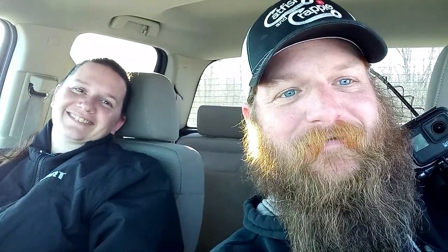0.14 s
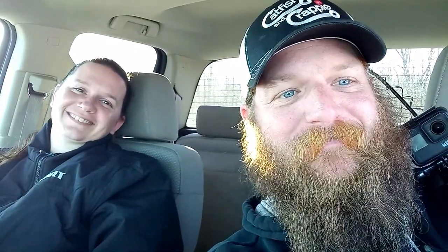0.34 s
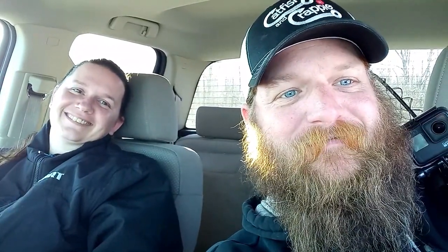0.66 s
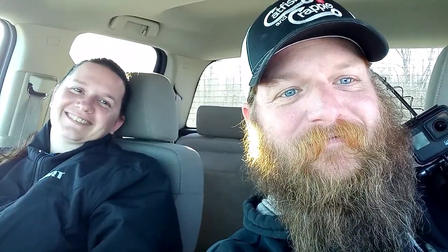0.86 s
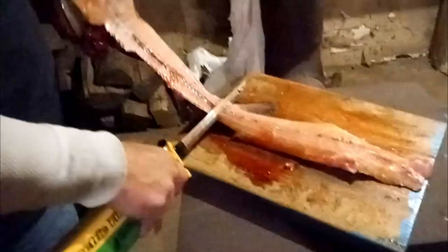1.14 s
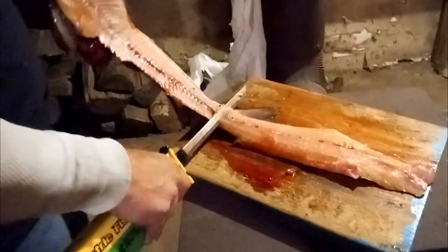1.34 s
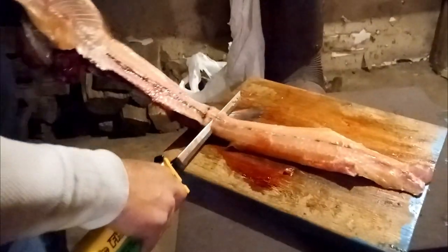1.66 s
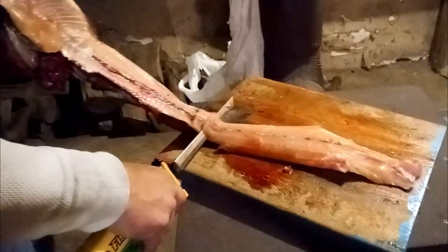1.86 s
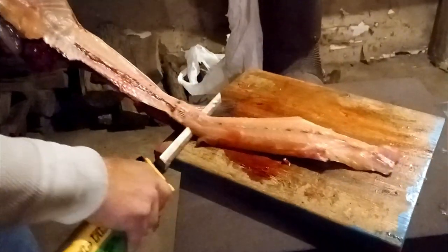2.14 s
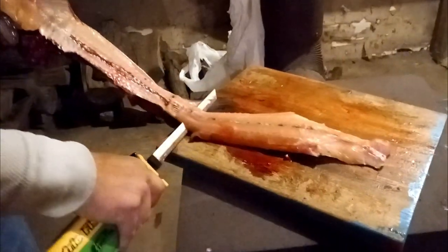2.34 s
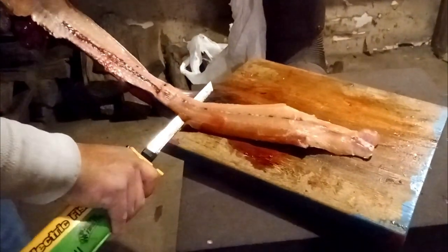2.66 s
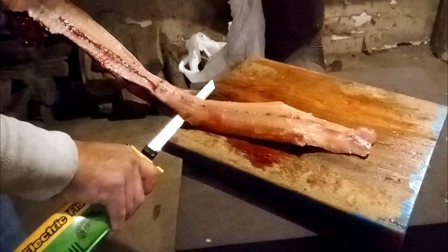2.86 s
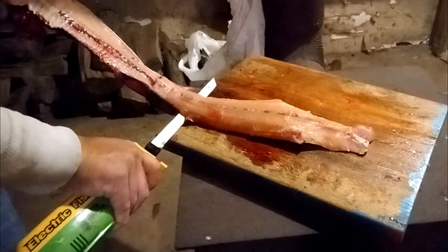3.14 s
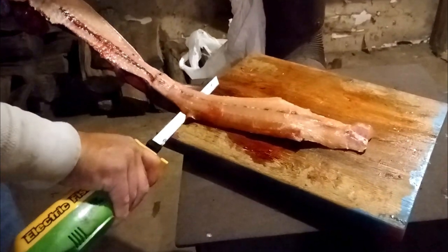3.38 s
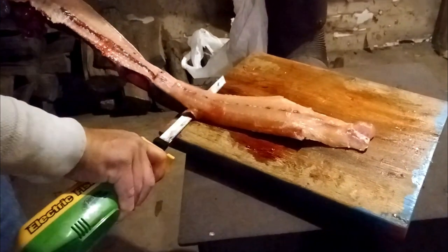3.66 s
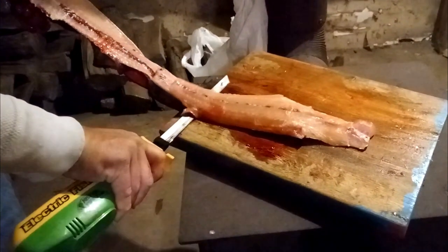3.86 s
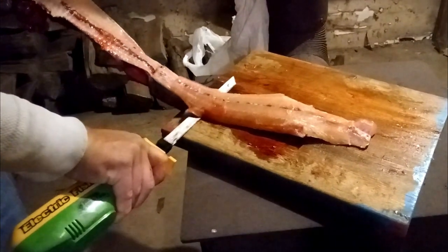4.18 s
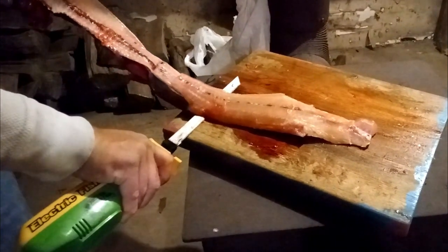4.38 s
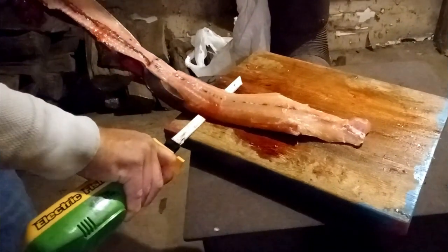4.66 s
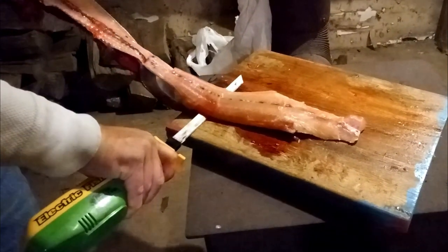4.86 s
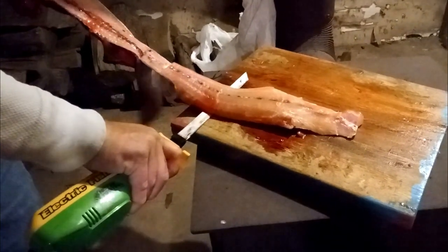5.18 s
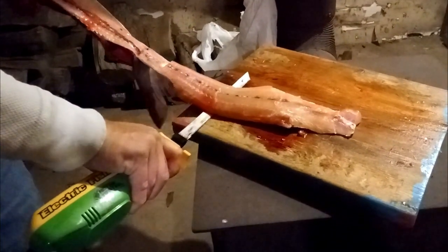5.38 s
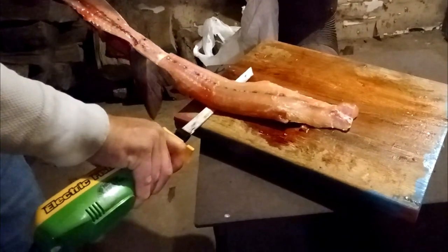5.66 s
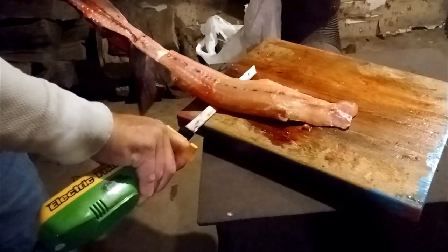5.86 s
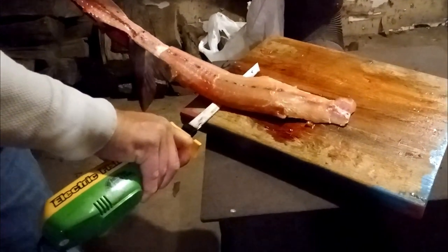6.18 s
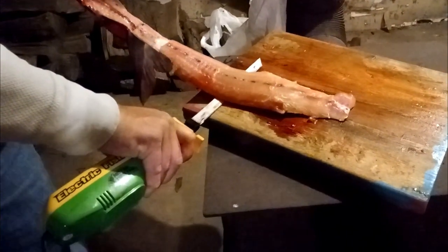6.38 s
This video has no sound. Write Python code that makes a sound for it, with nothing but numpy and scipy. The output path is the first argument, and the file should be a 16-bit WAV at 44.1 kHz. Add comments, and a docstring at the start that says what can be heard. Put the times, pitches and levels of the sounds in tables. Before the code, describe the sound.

Soft cloth brushes and a few tiny knocks open in a still car interior, followed by near silence. Then, close up in a shed, a hand-held electric knife clicks on and spins up in half a second. It keeps running to the end: buzzing motor whine, rattling plastic housing, hissing twin blades and teeth rasping on the cut, with a strong short scrape partway through. Dry, close mono sound.

```python
"""Parked car, then shed: a swish and small knocks, then an electric fillet knife saws a fillet off its skin.
The cloth is shaped noise; the knocks are blows on ringing modes. The motor runs up and whines: its partials
swell at each resonance of the drive, and the pitch follows the load. Gears and twin blades clatter through the
same round of contacts on every stroke, ringing the plastic housing; the blades hiss and tick. Faint bumps and
rubs and one strong scrape as the blades bite are swells of narrow noise bands; quiet air lies under everything."""
import sys
import numpy as np
from scipy import signal
from scipy.fft import rfft, irfft, next_fast_len
from scipy.io import wavfile
from scipy.ndimage import uniform_filter1d, map_coordinates

SR = 44100
rng = np.random.default_rng(int(sys.argv[2]) if len(sys.argv) > 2 else 0)


def generate_wav(sig):
    """Save sig (samples, or channels by samples) to the path in sys.argv[1] as 16-bit PCM at SR."""
    pcm = np.round(np.clip(np.atleast_2d(sig).T, -1, 1) * 32767).astype(np.int16)
    wavfile.write(sys.argv[1], SR, pcm)


N = 287532
TIME = np.arange(N) / SR  # s

# quiet air, first in the car, then in the shed: start_s, level_db
AIR_LEVEL = [(0, -69), (.5, -70), (1.21, -69), (1.222, -105), (1.25, -105), (1.262, -87), (1.32, -85),
             (6.52, -80)]
# air spectrum: freq_hz, relative_density_db
AIR_SPECTRUM = [(30, -45), (60, -25), (130, -16.5), (220, -23.5), (500, -20.5), (950, -20), (1250, -20),
                (1750, -21), (3000, -28.5), (4500, -34), (5500, -25.5), (6600, -23.5), (8500, -35),
                (15000, -50)]

# sleeve spectra, dull and bright part: freq_hz, relative_density_db
SWISH_DULL = [(80, -22), (160, -13), (300, -16), (500, -6), (1000, -14), (1600, -1), (2400, -14),
              (4000, -13), (5200, -40), (9000, -60)]
SWISH_BRIGHT = [(900, -30), (1900, -3.5), (2600, -10), (3200, -9), (4500, -14), (5500, -4.5), (7500, -12),
                (10000, -24), (16000, -34)]
# resonances that colour the swish: centre_hz, width_hz, lift_db
SWISH_MODES = [(517, 80, 8.5), (836, 56, 19), (973, 90, 24.5), (1300, 120, 7), (1670, 120, 1),
               (2620, 110, 12)]
# sleeve brushes: centre_s, level_db, fade_s, brightness_0_to_1
BRUSHES = [(0.053, -43, 0.03, 0.93), (.102, -42, 0.021, 0.03), (0.26, -61, 0.0093, 1), (.21, -59, 0.047, 1)]
BRUSH_SHAPE = 0.91  # exponent: 1 = pointed swell, 2 = rounded

# small knocks in the car: start_s, blow_db, contact_cutoff_hz
KNOCKS = [(0.117, -43, 470), (0.2438, -39, 9000), (0.25, -42.5, 2400), (0.274, -49, 2400)]
# modes the knocks ring: freq_hz, level_db, t60_s
KNOCK_MODES = [(133, -14, 0.23), (296, -8.5, 0.022), (1024, -2, 0.063), (1670, -2.5, 0.047),
               (2850, -11, 0.035), (3460, -3.5, 0.017), (5615, -13, 0.035)]
# bumps and rubs, faint ones and one strong scrape as the blades bite: centre_s, level_db, band_hz, fade_s
BUMPS_AND_RUBS = [(0.647, -62, 930, 0.033), (2.191, -48, 171, 0.04), (2.766, -59, 139, 0.0706),
                  (3.048, -60, 134.6, 0.094), (3.6, -28.5, 1000, 0.086)]
# trigger clicks: start_s, level_db
TRIGGER_CLICKS = [(1.318, -51), (1.342, -54)]

# run-up: exponential approach to running speed
SWITCH_ON_S, RUN_UP_S, UP_TO_SPEED_S = 1.345, 0.178, 1.9
RUNNING_WHINE_HZ, WHINE_CYCLES_PER_STROKE = 2614, 80
# whine pitch under the load of the cut, before the run-up scales it: start_s, pitch_hz
LOADED_WHINE = [(1.9, 2767.8), (2.05, 2880.2), (2.2, 2926.8), (2.36, 2939.0), (2.56, 2906.3), (2.9, 2787.9),
                (3.1, 2743.3), (3.3, 2722.1), (3.55, 2725.7), (3.85, 2754.0), (4.05, 2754.1),
                (4.22, 2729.3), (4.72, 2642.6), (4.95, 2619.0), (5.5, 2618.1), (5.85, 2620.5),
                (6.25, 2627.5), (6.52, 2619.9)]

# starting torque jolts the whole knife once
JOLT_AT_S, JOLT_FADE_S = 1.42, 0.04
JOLT_HOUSING_DB, JOLT_HISS_DB, JOLT_TEETH_DB, JOLT_OCTAVE_DB = 7.5, 5.5, 6, 6.5

# handle hum: start_s, level_db
HUM_LEVEL = [(2.5, -67.9), (3.05, -61), (3.3, -62), (3.85, -86), (4.1, -66), (4.35, -57.7), (4.8, -63.0),
             (6.45, -61.5)]
HUM_ORDER, HUM_RISE_DB_PER_S = 5, 13  # multiple of the stroke rate; build-up before the first point

# gear tones: stroke_rate_multiple, light_load_relative_db, full_load_relative_db
GEAR_ORDERS = [(10, -60, -64), (11, -65, -64), (12, -64, -58), (13, -57, -55), (15, -55, -60),
               (16, -55, -58), (18, -58, -54), (20, -37.5, -39.5), (22, -39, -37.5), (24, -46, -39),
               (29, -45, -46), (30, -39.5, -44), (31, -52, -48), (35, -50, -46), (40, -40.5, -54),
               (44, -48, -45), (52, -49, -48), (59, -48, -45), (60, -43, -54), (62, -50, -44),
               (64, -45, -51), (78, -54, -43), (84, -54, -45), (86, -56, -49), (260, -63, -57),
               (380, -70, -65)]
GEAR_DB = -1.03
LIGHT_LOAD_SPEED = 1.04  # share of running speed from which the load counts as light

# effort of the drive: start_s, level_db
EFFORT = [(1.75, -31.5), (2.3, -29), (3.05, -30), (3.9, -28.5), (4.8, -30), (6.45, -30.5)]
HOUSING_DB, HISS_DB = 0.76, -9  # relative to the effort
CLATTER_SPEED_POWER, HISS_SPEED_POWER = 0.68, 0.82  # amplitude exponents on the run-up
# pressure of the teeth on the board, as the level of their rasp: start_s, level_db
PRESSURE = [(1.52, -42.5), (1.62, -37), (2.1, -33), (3.42, -29.5), (3.57, -26), (3.72, -26.5), (4.3, -30.5),
            (6.45, -30.5)]
TEETH_DB = -3.5  # relative to the pressure
# housing, blade and board spectra: freq_hz, relative_density_db
HOUSING = [(60, -42), (130, -24), (260, -22.5), (420, -22), (540, -9), (720, -1.5), (920, -1), (1200, 4),
           (1650, -2.5), (2350, -2.5), (2800, -3.5), (3100, -10), (4100, -23.5), (6000, -39)]
BLADES = [(3000, -24), (3780, -1), (4250, -15.5), (4800, -6), (5700, -0.5), (6450, 5), (7300, -1),
          (8400, -7.5), (9600, -15.5), (11600, -12.5), (13000, -38), (14200, -21), (16000, -21)]
BOARD = [(150, -62), (300, -21), (540, -15.5), (680, 3.5), (800, 9), (1000, -5.5), (1400, -30), (2200, -28)]
# narrow housing resonances: centre_hz, width_hz, lift_db
HOUSING_MODES = [(808, 43, 7.5), (1180, 160, 3), (1540, 60, 3.5), (1716.7, 88, 5), (1930, 51, 1),
                 (2045, 59, 5.5)]
# blade ticks within a stroke: place_0_to_1, relative_level_db
TICKS = [(.12, 21), (.34, -38), (.66, -34), (.8, -19)]
# modes the blade ticks ring: freq_hz, relative_level_db, t60_s
TICK_MODES = [(6900, 6.5, 0.0074), (7800, 4, .005), (12400, 2, .005), (13950, -4.5, 0.0067),
              (14700, -12, .006)]

# whine partials away from any resonance, steady running
WHINE_DB, OCTAVE_DB, THIRD_DB, FOURTH_DB, SIXTH_DB = -41.5, -56.5, -65, -63.5, -67
# drive resonances the partials sweep through: centre_hz, width_hz, lift_db
DRIVE_MODES = [(1390, 490, 10.5), (2147, 350, 15), (2606, 132, 7.5), (2690, 52.6, 10.5), (2953, 73, 7.5),
               (3420, 520, 10), (5440, 350, 5.5), (5715, 510, 14), (6770, 760, 14), (9100, 340, 3),
               (10700, 2200, 11)]
# gear-tooth chatter: extra roughness at the start settles to the running value
ROUGH_START, ROUGH_RUNNING, SETTLE_S = 1, 0.078, 1
CHATTER_CYCLES, CHATTER_DB = 0.081, 2.5  # phase and level scatter per unit roughness
WAVER_DB, WAVERS_PER_S = 1.0, 5  # slow level waver of the partials
THROB_HZ = 120  # twice the mains frequency
# throb depth of the whine: start_s, depth_0_to_1
THROB_DEPTH = [(1.55, 0.85), (2.2, 0), (3.2, 0.66), (4.2, 0.55), (4.9, 0.2)]
THROB_SWING, THROB_BEND_CYCLES = 0.7, 0.14  # at full depth: share of amplitude, phase
STARTING_LIFT_DB = 11.5  # lift of whine and octave by the starting torque at standstill
WHINE_FOLLOWS_PRESSURE = 0.47  # share of the pressure's dB swing
ENGAGE_FROM, ENGAGE_SPAN = 0.21, 0.15  # shares of running speed over which the gears begin to sing

CUTOFF_HZ = 15750


def from_db(db):
    """Decibels to gain."""
    return 10 ** (np.asarray(db) / 20)


def rms_one(x):
    """Scale to unit rms."""
    return x / np.sqrt(np.mean(x ** 2) + 1e-20)


def in_time(rows):
    """One curve for each column after the time column."""
    s, *columns = np.transpose(rows)
    return [np.interp(TIME, s, c) for c in columns]


def drift(rate_hz):
    """Smooth random curve with spread 1."""
    knots = rng.standard_normal(int(rate_hz * N / SR) + 3)
    coarse_s = TIME[::32]
    curve = map_coordinates(knots, [coarse_s * rate_hz], order=3, mode="nearest")
    return np.interp(TIME, coarse_s, rms_one(curve))


def lift_db(hz, modes):
    """Lift that a set of resonances gives at a frequency."""
    return sum(lift / (1 + (2 * (hz - centre) / width) ** 2) for centre, width, lift in modes)


def coloured(x, spectrum, modes=()):
    """Pass through a body with a broad spectrum and narrow resonances; rms 1."""
    size = next_fast_len(N + SR)
    hz = np.maximum(np.fft.rfftfreq(size, 1 / SR), 1)
    points = np.array(spectrum)
    level_db = np.interp(np.log(hz), np.log(points[:, 0]), points[:, 1]) + lift_db(hz, modes)
    bass_cut = np.minimum(hz / points[0, 0], 1) ** 2
    return rms_one(irfft(rfft(x, size) * from_db(level_db) * bass_cut, size)[:N])


def evened(x):
    """Hold the slow level of a running sound near 1."""
    power = uniform_filter1d(x ** 2, size=2700)
    return x / np.sqrt(np.maximum(power, 0) + 1e-4)


def ring(x, hz, t60_s):
    """Resonator: a unit click starts a decaying sine of height 1."""
    r = from_db(-60 / (t60_s * SR))
    w = 2 * np.pi * hz / SR
    return signal.lfilter([0, np.sin(w)], [1, -2 * r * np.cos(w), r * r], x + 1e-18)


def tone(cycles, level_db):
    """A sine of the given rms level."""
    return np.sqrt(2) * from_db(level_db) * np.sin(2 * np.pi * cycles)


def contacts(strokes, count, jitter_s, uneven_db, spread_db):
    """The same round of contacts on every stroke, each a little early or late, harder or softer."""
    place = (np.arange(count) + rng.random(count)) / count
    force = rng.choice([-1, 1], count) * from_db(spread_db * rng.uniform(-1.27, 1, count))
    timing, strength = rng.standard_normal((2, 256, count))  # one row per stroke
    at_stroke = np.arange(len(timing))[:, None] + place
    when_s = np.interp(at_stroke, strokes, TIME, right=-1) + jitter_s * timing
    inside = (when_s > 0) & (when_s < TIME[-1])
    sizes = force * from_db(uneven_db * strength)
    return rms_one(np.bincount((when_s[inside] * SR).astype(int), sizes[inside], N))


def air():
    """Quiet air: shaped noise on a level curve."""
    return from_db(in_time(AIR_LEVEL)[0]) * coloured(rng.standard_normal(N), AIR_SPECTRUM)


def sleeve():
    """Each brush of the cloth swells and fades with a fine grain, part dull and part bright."""
    dull = coloured(rng.standard_normal(N), SWISH_DULL, SWISH_MODES)
    bright = coloured(rng.standard_normal(N), SWISH_BRIGHT, SWISH_MODES)
    out = np.zeros(N)
    for centre_s, level_db, fade_s, brightness in BRUSHES:
        swell = from_db(level_db) * np.exp(-np.abs((TIME - centre_s) / fade_s) ** BRUSH_SHAPE)
        out += swell * (np.sqrt(brightness) * bright + np.sqrt(1 - brightness) * dull)
    return out * from_db(2 * drift(252))


def small_knocks():
    """Something small knocks and bounces: low-passed blows, softer contact = lower cut-off, ring its modes."""
    blows = np.zeros(N)
    for start_s, blow_db, cutoff_hz in KNOCKS:
        blow = from_db(blow_db) * (np.arange(N) == round(start_s * SR))
        blows += signal.sosfilt(signal.butter(2, cutoff_hz, fs=SR, output="sos"), blow + 1e-18)
    return sum(from_db(level_db) * ring(blows, hz, t60_s) for hz, level_db, t60_s in KNOCK_MODES)


def car():
    """Cloth swishes and small knocks."""
    return sleeve() + small_knocks()


def bumps_and_rubs():
    """Faint bumps and rubs and one strong scrape as the blades bite: each a short swell of a narrow noise band."""
    out = np.zeros(N)
    for centre_s, level_db, hz, fade_s in BUMPS_AND_RUBS:
        band = signal.butter(2, [hz * 0.87, hz * 1.04], "band", fs=SR, output="sos")
        noise = rms_one(signal.sosfilt(band, rng.standard_normal(N)))
        out += from_db(level_db) * noise * np.exp(-((TIME - centre_s) / fade_s) ** 2)
    return out


def trigger():
    """The switch slides in with two small clicks, heard through the handle."""
    clicks = sum(from_db(level_db) * (TIME > start_s) * np.exp(-np.abs(TIME - start_s) / 0.0017)
                 for start_s, level_db in TRIGGER_CLICKS)
    slide = from_db(-64.5) * (TIME > TRIGGER_CLICKS[0][0]) * (TIME < 1.38)
    handle = coloured(rng.standard_normal(N), HOUSING, HOUSING_MODES)
    handle += 0.072 * coloured(rng.standard_normal(N), BLADES)
    return uniform_filter1d(clicks + slide, size=60) * handle


def run_up():
    """Share of its running speed that the motor has reached, 0-1."""
    since_on_s = np.clip(TIME, SWITCH_ON_S, UP_TO_SPEED_S) - SWITCH_ON_S
    gathered = 1 - np.exp(-since_on_s / RUN_UP_S)
    return gathered / gathered[-1]


def jolt():
    """One short swell of the starting torque, 0-1."""
    return np.exp(-((TIME - JOLT_AT_S) / JOLT_FADE_S) ** 2)


def hum(strokes):
    """The handle hums at five times the stroke rate, building up as the motor gathers speed."""
    build_up_db = -HUM_RISE_DB_PER_S * np.maximum(HUM_LEVEL[0][0] - TIME, 0)
    return tone(HUM_ORDER * strokes, in_time(HUM_LEVEL)[0] + build_up_db)


def gears(strokes, speed):
    """Multiples of the stroke rate; they stand out only near running speed, balance shifting with load."""
    light = np.clip((speed - 1) / (LIGHT_LOAD_SPEED - 1), 0, 1)
    out = np.zeros(N)
    for order, light_db, loaded_db in GEAR_ORDERS:
        level_db = GEAR_DB + loaded_db + light * (light_db - loaded_db)
        cycles = order * strokes + rng.random() + 0.04 * drift(14)
        out += tone(cycles, level_db + 2 * drift(10))
    return out * run_up() ** 14


def clatter(strokes):
    """Gear and crank contacts ring the housing; the teeth rasp on the board."""
    housing_db = in_time(EFFORT)[0] + HOUSING_DB + JOLT_HOUSING_DB * jolt()
    housing_gain = from_db(housing_db) * run_up() ** CLATTER_SPEED_POWER
    teeth_gain = from_db(in_time(PRESSURE)[0] + TEETH_DB + JOLT_TEETH_DB * jolt())
    tight = contacts(strokes, count=40, jitter_s=0.00004, uneven_db=2, spread_db=7)
    tight = signal.sosfilt(signal.butter(4, 950, "high", fs=SR, output="sos"), tight)
    loose = contacts(strokes, count=60, jitter_s=0.002, uneven_db=3, spread_db=2.5)
    drive = 0.68 * tight + 0.77 * loose + 0.34 * rng.standard_normal(N)
    housing = evened(coloured(drive, HOUSING, HOUSING_MODES))
    teeth = contacts(strokes, count=32, jitter_s=0.0004, uneven_db=3, spread_db=4)
    return housing_gain * housing + teeth_gain * evened(coloured(teeth, BOARD))


def blade_ticks(strokes):
    """The blades tap in their guide at set places of each stroke, harder in some stretches than in others."""
    taps = np.zeros(N)
    for place, level_db in TICKS:
        at = np.flatnonzero(np.diff(np.floor(strokes - place + 0.02 * drift(40))) > 0)
        taps[at] += from_db(level_db + 3.1 * np.clip(rng.standard_normal(len(at)), -3, 1.5))
    taps *= from_db(2.5 * np.clip(drift(2), -2, 1))
    return rms_one(sum(from_db(level_db) * ring(taps, hz, t60_s) for hz, level_db, t60_s in TICK_MODES))


def blades(strokes):
    """Steel slides on steel, hissing in step with the motor and ticking where the blades turn."""
    hiss_db = in_time(EFFORT)[0] + HISS_DB + JOLT_HISS_DB * jolt()
    gain = from_db(hiss_db) * run_up() ** HISS_SPEED_POWER
    rub = rng.standard_normal(N)
    rub += 0.81 * contacts(strokes, count=120, jitter_s=0.00002, uneven_db=4.5, spread_db=0)
    throb = 0.071 * np.sin(2 * np.pi * THROB_HZ * TIME)
    stroke_swing = 0.081 * np.sin(8 * np.pi * strokes)  # four swings per stroke
    rub *= 1 + throb + 0.091 * drift(70) + stroke_swing
    fade_in = np.clip((TIME - 1.5) / 0.5, 0, 1)
    ticks = from_db(-15.7) * blade_ticks(strokes) * fade_in
    return gain * (evened(coloured(rub, BLADES)) + ticks)


def motor(strokes, speed):
    """Whine with overtones, pulsing with the mains; partials swell as they cross resonances of the drive."""
    hz = speed * RUNNING_WHINE_HZ
    rough = ROUGH_RUNNING + ROUGH_START * np.exp(-np.maximum(TIME - SWITCH_ON_S, 0) / SETTLE_S)
    surge = np.sin(2 * np.pi * THROB_HZ * TIME)
    mains = in_time(THROB_DEPTH)[0] * surge
    cycles = strokes * WHINE_CYCLES_PER_STROKE
    chatter = CHATTER_CYCLES * rough * drift(180)
    # the crank brakes the motor within each stroke
    wobble = 0.013 * np.sin(2 * np.pi * strokes) + 0.018 * np.sin(8 * np.pi * strokes)
    starting_db = STARTING_LIFT_DB * (1 - run_up())
    pressure_db = WHINE_FOLLOWS_PRESSURE * (in_time(PRESSURE)[0] - PRESSURE[-1][1])
    engaged = np.clip((run_up() - ENGAGE_FROM) / ENGAGE_SPAN, 0, 1)

    def partial(order, level_db, bend):
        """One multiple of the whine, shaped by the resonances and by the chatter of the gear teeth."""
        unsteady_db = (0.59 + CHATTER_DB * rough) * drift(40) + WAVER_DB * drift(WAVERS_PER_S)
        shaped_db = level_db + lift_db(order * hz, DRIVE_MODES) + unsteady_db
        return tone(order * (cycles + bend) + chatter, shaped_db)

    # current surges swing the whine's level and bend its pitch
    whine = partial(order=1, level_db=WHINE_DB + starting_db + pressure_db, bend=THROB_BEND_CYCLES * mains)
    whine *= 1 + THROB_SWING * mains
    octave = partial(order=2, level_db=OCTAVE_DB + starting_db + JOLT_OCTAVE_DB * jolt(), bend=wobble)
    third = partial(order=3, level_db=THIRD_DB, bend=0)
    third *= np.minimum(8 * rough ** 2, 2)  # strong only while the teeth chatter
    fourth = partial(order=4, level_db=FOURTH_DB, bend=wobble / 2)
    sixth = tone(6 * cycles, SIXTH_DB)
    overtones = (octave + third + fourth + sixth) * (1 + (0.067 + 0.83 * rough) * mains)
    # magnetic pull: two tones beside the octave
    buzz = tone(2 * cycles + 1 / 4, -51 + 2 * drift(6.4)) * surge * np.minimum(speed, 1) ** 6
    return engaged * (whine + overtones) + buzz


def knife():
    """The motor runs up and drives everything from one shaft."""
    whine_hz = in_time(LOADED_WHINE)[0] * run_up() * (1 + 0.0004 * drift(18))
    strokes = np.cumsum(whine_hz) / SR / WHINE_CYCLES_PER_STROKE
    speed = whine_hz / RUNNING_WHINE_HZ
    running = np.clip((TIME - 1.362) / 0.047, 0, 1)
    # heavy starting current shakes the knife at twice the mains frequency
    inrush = 1 + 0.4 * np.clip((1.6 - TIME) / 0.2, 0, 1) * np.sin(2 * np.pi * THROB_HZ * TIME)
    tones = motor(strokes, speed) + gears(strokes, speed) + hum(strokes)
    noises = inrush * (clatter(strokes) + blades(strokes))
    return trigger() + running * (tones + noises)


def scene():
    """Car, then knife with bumps and rubs, over quiet air; one channel."""
    return (air() + car() + bumps_and_rubs() + knife())[None]


def record(dry):
    """Steep low-pass on the top."""
    return signal.sosfilt(signal.ellip(12, 0.1, 80, CUTOFF_HZ, fs=SR, output="sos"), dry)


dry = scene()
out = record(dry)
generate_wav(out)
```